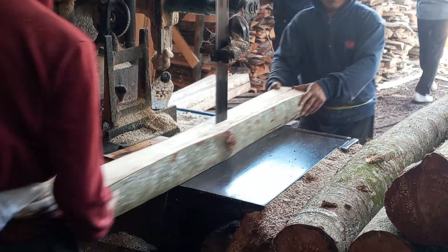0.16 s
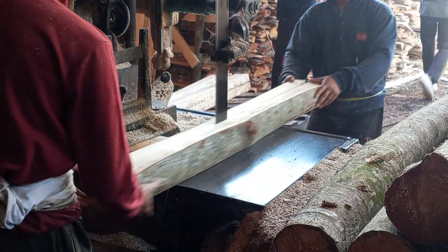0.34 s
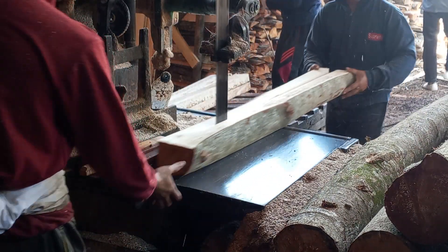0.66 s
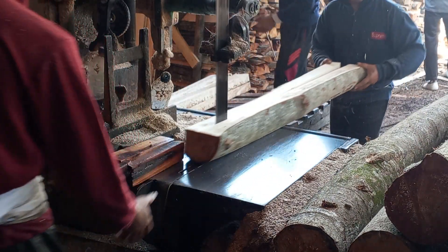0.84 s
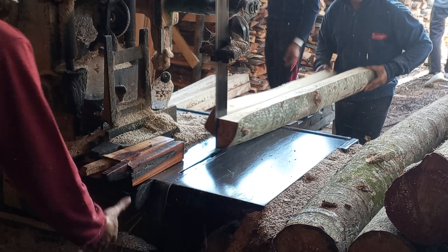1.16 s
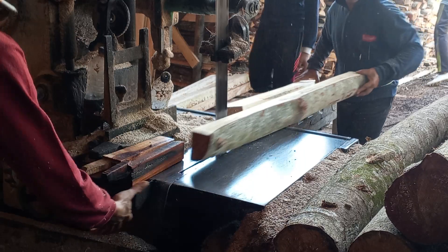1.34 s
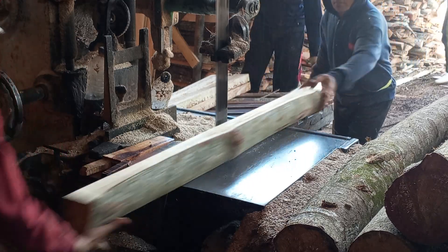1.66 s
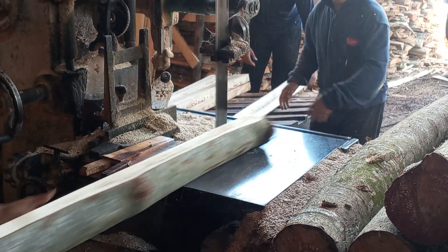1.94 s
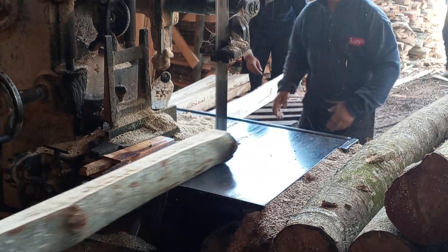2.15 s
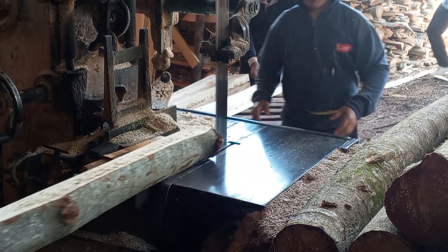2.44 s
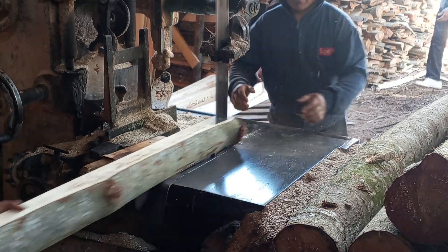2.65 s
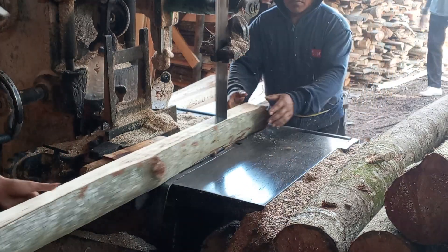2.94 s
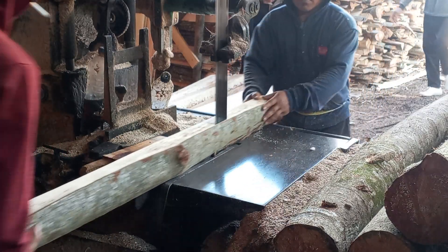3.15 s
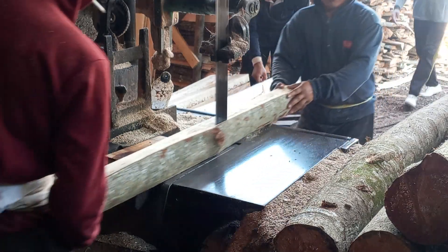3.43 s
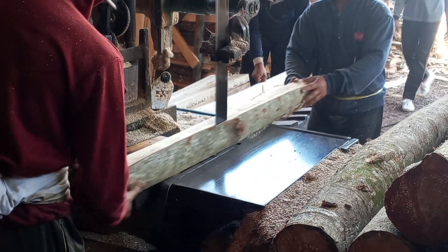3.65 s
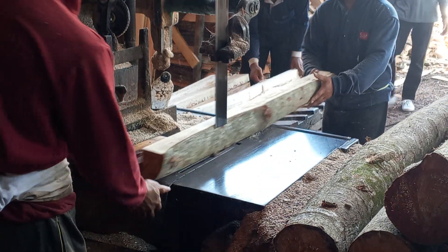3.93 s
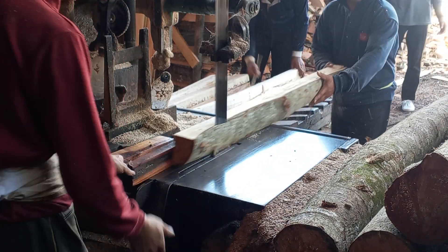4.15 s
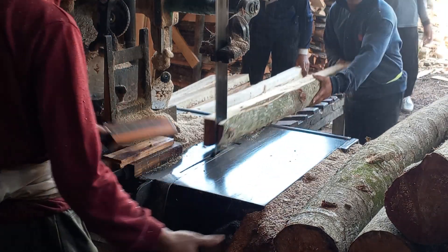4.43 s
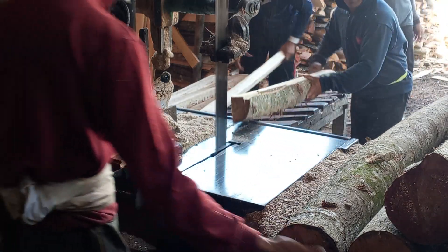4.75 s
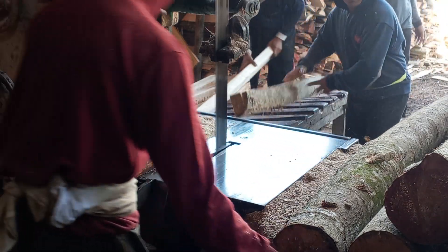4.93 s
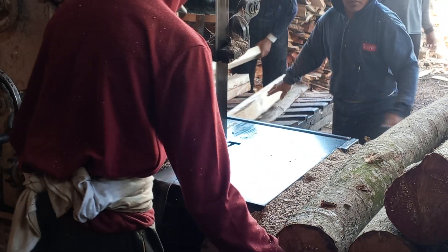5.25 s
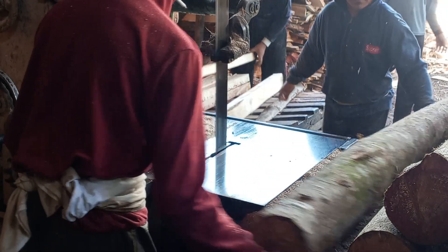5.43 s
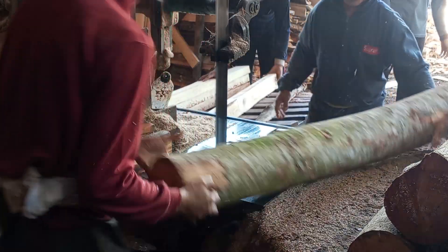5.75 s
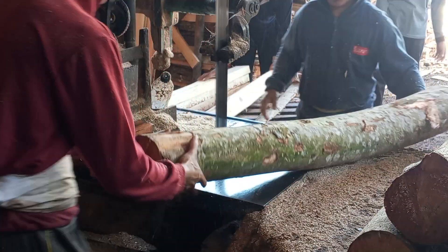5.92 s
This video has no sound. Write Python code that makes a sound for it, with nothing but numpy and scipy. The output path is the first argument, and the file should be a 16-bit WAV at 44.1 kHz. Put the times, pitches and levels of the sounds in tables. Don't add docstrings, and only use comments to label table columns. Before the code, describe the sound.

A band saw drones and hisses steadily while timber is ripped twice with a bright, wavering metallic whine, between dull knocks of wood.

```python
import sys
import numpy as np
from scipy import signal
from scipy.fft import rfft, irfft, next_fast_len
from scipy.io import wavfile
from scipy.ndimage import uniform_filter1d

SR = 44100
rng = np.random.default_rng(int(sys.argv[2]) if len(sys.argv) > 2 else 0)


def materialize(psi):
    bounded = np.clip(np.atleast_2d(psi).T, -1, 1)
    quanta = np.round(bounded * 32767).astype(np.int16)
    wavfile.write(sys.argv[1], SR, quanta)


def invert_db(level):
    return 10 ** (np.asarray(level, dtype=float) / 20)


N = 268569
TOP_CUT_HZ = 15720

# teeth_enter_s, teeth_leave_s
CUTS = [
    (-.3, 1.122),
    (2.62, 4.522),
]


def rms_one(x):
    return x / np.sqrt(np.mean(x ** 2) + 1e-20)


def curve(rows):
    s, value = np.transpose(rows)
    return np.interp(np.arange(N) / SR, s, value)


def swells(rows):
    t = np.arange(N // 40 + 2) * 40 / SR
    out = np.zeros(len(t))
    for s, length_s, level_db in rows:
        out += level_db * np.exp(-(2 * (t - s) / length_s) ** 4)
    return np.interp(np.arange(N) / SR, t, out)


def drift(rate_per_s):
    r = np.exp(-80 * np.pi * rate_per_s / SR)
    sparse = rng.standard_normal(N // 40 + 2002)
    slow = signal.lfilter([1], [1, -2 * r, r * r], sparse)[2000:]
    return np.interp(np.arange(N) / 40, np.arange(len(slow)), rms_one(slow))


def at_hz(points, hz):
    points_hz, points_db = np.transpose(points)
    return np.interp(np.log(hz), np.log(points_hz), points_db)


def coloured(spectrum, patchy_db, count):
    size = next_fast_len(N)
    hz = np.maximum(np.fft.rfftfreq(size, 1 / SR), 1)
    low_hz, high_hz = spectrum[0][0], spectrum[-1][0]
    inside = (hz > low_hz) & (hz < high_hz)
    noise = rfft(rng.standard_normal(size)) * invert_db(at_hz(spectrum, hz)) * inside
    place = np.log(hz / low_hz) / np.log(high_hz / low_hz) * (count - 1)
    out, together = 0, drift(21)
    for k in range(count):
        part = irfft(noise * np.clip(1 - np.abs(place - k), 0, 1), size)[:N]
        out = out + part * invert_db(patchy_db * (0.8 * together + drift(16)))
    return rms_one(out)


def resonance(x, hz, width_hz):
    r = np.exp(-np.pi * width_hz / SR)
    poles = [1, -2 * r * np.cos(2 * np.pi * hz / SR), r * r]
    return signal.lfilter([(1 - r * r) / 2, 0, (r * r - 1) / 2], poles, x)


def band_noise(length, low_hz, high_hz):
    sos = signal.butter(2, [low_hz, high_hz], "band", fs=SR, output="sos")
    return rms_one(signal.sosfilt(sos, rng.standard_normal(length)))


def tone(hz, wander_hz):
    wander_per_s = 11
    pitch_hz = hz + wander_hz * drift(wander_per_s)
    return np.sqrt(2) * np.sin(2 * np.pi * np.cumsum(pitch_hz) / SR)


def in_wood(leave_s):
    enter_s = 0.0096
    t, out = np.arange(N) / SR, 0
    for a, b in CUTS:
        leaving = np.exp(-np.clip(t - b, 0, 30 * leave_s) / leave_s)
        out = out + np.clip((t - a) / enter_s, 0, 1) * leaving
    return out


def machine_levels(damped):
    # time_s, level_db
    rub = [(0, -5), (.15, 10), (.42, 2), (1.05, 5.5), (1.17, 3.5), (1.27, -1.2), (1.5, -6), (1.95, 1.5),
           (2.3, 1.7), (2.6, -4.5), (2.76, 0), (3.35, 4), (3.9, -1), (4.25, 3.5), (4.56, 3), (4.66, 2.5),
           (5.5, -0.5), (6.09, 2.3)]
    rub_db, flutter_per_s = curve(rub), 8.4
    # mean_db, share of rub, loss in wood_db, flutter_db
    frame_layer, table_layer = (-34, -0.2, 0.6, 1.0), (-24, 0.36, 3, 2.24)
    blade_layer, wheel_layer = (-26.5, 0.24, 2, 0.9), (-34.5, 0.3, 0, 0.9)
    return [mean_db + share * rub_db - loss_db * damped + flutter_db * drift(flutter_per_s)
            for mean_db, share, loss_db, flutter_db in (frame_layer, table_layer, blade_layer, wheel_layer)]


def frame_drone(drone_db, bed_db):
    # frequency_hz, density_db
    drone_spectrum = [(21, -60), (35, -28.5), (152, -18), (264, -10), (331, -17.5), (539, -11),
                      (610, -14.5), (811, -6.5), (917, -7), (1500, -3), (2210, -0.5), (2440, 1.5),
                      (3250, 0), (3670, 1), (4600, -36.5), (5980, -47), (10100, -120)]
    drone = coloured(drone_spectrum, patchy_db=0.9, count=12)
    low = signal.sosfilt(signal.butter(2, 1100, fs=SR, output="sos"), drone)
    return invert_db(drone_db + 14) * low + invert_db(bed_db + 4) * (drone - low)


def steel_resonances(drone_db, hum_db, bed_db, ring_db, hiss_db):
    # centre_hz, width_hz, level_db
    modes = [(258, 18, -14), (440, 43, -7.5), (570, 17, -10.5), (687, 20.3, -4.5), (889, 35, -3),
             (916.4, 33, -3), (995, 20, -3), (1031, 12, -7), (1145, 52, -2), (1202, 9.5, -28),
             (1266, 29, -6), (1361, 13, -3.5), (2140, 6, -18), (2405, 40, -3), (2460, 50, -3),
             (2781, 40, -3), (3530, 40, -6), (2680, 880, -21.5), (2686, 93, -4.5), (2900, 650, -35),
             (3832, 140, -3), (8710, 106, -3)]
    flutter_db, out = 1.8, np.zeros(N)
    for hz, width_hz, level_db in modes:
        if hz < 800:
            follow_db = drone_db + 8
        elif hz < 940:
            follow_db = hum_db + 8
        elif hz < 2000:
            follow_db = bed_db + 4
        else:
            follow_db = ring_db if hz < 5000 else hiss_db
        rub = resonance(resonance(rng.standard_normal(N), hz, width_hz), hz, 5.4 * width_hz)
        out += invert_db(follow_db + level_db + 14 + flutter_db * drift(6)) * rub
    return out


def free_tones(hum_db, ring_db, damped):
    blade_loss_db = 7
    out = invert_db(hum_db - 5.5) * tone(898, wander_hz=10.89)
    for hz, wander_hz, level_db in [(2440, 28.2, -11.5), (2790, 26, -14)]:
        blade_db = ring_db + level_db - blade_loss_db * damped + 3 * drift(14)
        out += invert_db(blade_db) * tone(hz, wander_hz)
    return out


def blade_hiss(hiss_db):
    # frequency_hz, density_db
    hiss_spectrum = [(2470, -35), (4200, -12), (4930, -10.5), (5690, -4.5), (6040, 0.5), (6390, 0),
                     (6800, 0), (7020, -8.5), (7900, -8), (9090, -6), (10700, 1.5), (11400, -3),
                     (12600, -14), (13900, -20), (14800, -21.5), (16000, -13)]
    return invert_db(hiss_db + 5.5) * coloured(hiss_spectrum, patchy_db=0.5, count=9)


def machine():
    # middle_s, length_s, level_db
    beats = [(.12, 0.091, 3.5), (.36, 0.086, 6.5), (.74, 0.062, 6), (1.02, 0.05, 2), (1.56, 0.14, 8),
             (2.2, 0.21, 4), (2.44, 0.089, 4), (3.3, 0.24, 2), (3.64, 0.06, 4), (4.35, 0.35, 6.5),
             (4.7, 0.13, 3.5), (4.88, .08, 9.5), (5.04, 0.042, 9), (5.32, .05, 6.5), (5.46, 0.1, 5.5),
             (6.07, 0.076, 7.5)]
    # middle_s, length_s, level_db
    settles = [
        (1.45, 0.22, -2),
        (2.85, .32, -2.5),
    ]
    damped = in_wood(leave_s=0.036)
    drone_db, ring_db, hiss_db, hum_db = machine_levels(damped)
    hum_db = hum_db + swells(beats)
    drone_db = uniform_filter1d(drone_db + swells(settles), size=SR // 8)
    bed_db = uniform_filter1d((drone_db + ring_db + hiss_db) / 3, size=SR // 14)
    out = frame_drone(drone_db, bed_db)
    out += steel_resonances(drone_db, hum_db, bed_db, ring_db, hiss_db)
    out += free_tones(hum_db, ring_db, damped)
    return out + blade_hiss(hiss_db)


def whine_levels(bite_db):
    # multiple, level at mean feed_db
    low_orders = [(2, -40.5), (3, -36), (4, -40), (6, -41)]
    # multiple, above low whine_db, above chip hiss_db
    high_orders = [(1, -4.5, -40), (5, -6, -22), (7, -20, -1), (8, -20, -7), (9, -20, -4.5), (10, -20, 3),
                   (11, -20, 6), (12, -20, 3), (13, -30, -6), (14, -30, -25), (15, -30, -3)]
    # middle_s, length_s, multiple, level_db
    sings = [(0.026, 0.087, 6, 8.5), (0.157, 0.22, 3, 5.5), (0.22, 0.12, 2, 4), (.62, .16, 3, 4),
             (0.923, 0.37, 3, 4.5), (1.12, 0.11, 2, 6), (1.08, 0.21, 4, 10), (2.86, 0.045, 2, 12.5),
             (2.865, .12, 3, 7.5), (3.08, 0.13, 2, 9.5), (3.089, .24, 3, 5), (3.109, 0.42, 6, 9),
             (3.4, .2, 4, 12), (3.36, .16, 6, 11), (3.72, 0.11, 2, 4), (4.174, 0.4, 2, 14.5),
             (3.95, 0.14, 2, 3), (4.057, 0.27, 3, 9.5), (4.298, 0.13, 3, 7), (3.93, 0.37, 6, 6.5),
             (4.22, .2, 6, 4), (4.13, 0.1, 4, 12), (4.37, .16, 4, 7)]
    feed_mean_db, feed_share = -35, 0.25
    grain_db_per_octave, grain_per_s = 1.1, 22
    end_s, end_strike_db, end_full_up_to = 0.095, 16, 2.6
    end_db = swells([(CUTS[1][0] + 0.37 * end_s, end_s, end_strike_db)])
    levels = []
    for k, mean_db in low_orders:
        level_db = mean_db + feed_share * (bite_db - feed_mean_db)
        level_db = level_db + end_db * min(1, end_full_up_to / k)
        level_db += grain_db_per_octave * np.log2(k) * drift(grain_per_s)
        level_db += swells([(s, length_s, db) for s, length_s, m, db in sings if m == k])
        levels.append((k, level_db))
    whine_db = np.mean([db for k, db in levels[1:]], axis=0) + 0.28 * end_db
    for k, whine_part_db, bite_part_db in high_orders:
        levels.append((k, np.maximum(whine_db + whine_part_db, bite_db + bite_part_db)))
    return levels


def tooth_whine(bite_db):
    # time_s, tooth_rate_hz
    speed = [(0, 977), (.4, 972), (1.14, 973), (2.62, 992), (2.76, 980), (3.03, 973.5), (3.69, 965),
             (4.13, 969), (4.53, 969)]
    blur_hz, clean_up_to = 1.7, 5.2
    phase = 2 * np.pi * np.cumsum(curve(speed)) / SR
    out = np.zeros(N)
    for k, level_db in whine_levels(bite_db):
        clean = np.exp(-(k / clean_up_to) ** 2)
        blur = (drift(blur_hz * k * k) + 1j * drift(blur_hz * k * k)) / np.sqrt(2)
        swing = np.sqrt(clean) + np.sqrt(1 - clean) * blur
        turning = np.exp(1j * (k * phase + rng.uniform(0, 2 * np.pi)))
        out += np.sqrt(2) * invert_db(level_db) * np.real(swing * turning)
    return out


def chip_hiss(bite_db):
    # frequency_hz, density_db
    chip_spectrum = [(6000, -39), (7600, 0.5), (8150, -36), (8600, 3), (9200, -9), (9720, 5), (10800, 3),
                     (12400, -12), (13300, -9), (13900, -24), (14500, -6), (15200, -6), (16000, -12)]
    return invert_db(bite_db + 8.5) * coloured(chip_spectrum, patchy_db=3, count=6)


def cut():
    # time_s, level_db
    feed = [(0, -32.5), (.15, -35), (.3, -35), (.6, -32.5), (1.1, -33), (2.63, -39), (2.72, -39),
            (2.9, -36), (3.3, -37.5), (3.37, -32), (3.5, -37), (3.8, -33), (4.35, -41), (4.5, -36.5)]
    bite_db = curve(feed)
    return (tooth_whine(bite_db) + chip_hiss(bite_db)) * in_wood(leave_s=0.0058)


def timber_knocks():
    # start_s, peak_db, ring_hz, thud_hz, thud_db
    knocks = [(1.767, -10.5, 609, 310, -25), (1.791, -21, 643, 110, -34), (1.807, -25, 588, 100, -46),
              (5.157, -11, 193, 120, -21), (5.168, -22, 344, 62, -28), (5.186, -20, 295, 109, -33),
              (5.679, -22, 627, 266, -21), (5.693, -18, 420, 268, -23), (5.71, -24.5, 707, 416, -37),
              (5.723, -32, 873, 258, -43), (5.864, -46, 400, 204, -31)]
    ring_t60_per_hz = 0.00022
    out, t = np.zeros(N), np.arange(SR // 2) / SR
    for s, peak_db, hz, thud_hz, thud_db in knocks:
        hit = invert_db(peak_db - 60 * t / (ring_t60_per_hz * hz)) * np.sin(2 * np.pi * hz * t)
        hit += invert_db(thud_db - 60 * t / 0.12) * np.sin(2 * np.pi * thud_hz * t)
        hit += invert_db(peak_db - 10 - 60 * t / 0.22) * band_noise(len(t), 107, 1050)
        i = round(s * SR)
        out[i:i + len(t)] += (hit * (1 - np.exp(-t / 0.0073)))[:N - i]
    return out


def entry_crunch():
    # start_s, level_db, t60_s, low_hz, high_hz
    crunches = [
        (2.623, -20, 0.22, 890, 2600),
        (2.643, -22.5, 0.45, 1100, 2600),
        (2.655, -31, 0.24, 800, 3400),
    ]
    out, t = np.zeros(N), np.arange(SR // 2) / SR
    for s, level_db, t60_s, low_hz, high_hz in crunches:
        i = round(s * SR)
        crunch = band_noise(len(t), low_hz, high_hz)
        out[i:i + len(t)] += invert_db(level_db - 60 * t / t60_s) * np.minimum(t / 0.004, 1) * crunch
    return out


def scene():
    # middle_s, length_s, level_db
    ducks = [
        (1.165, 0.064, -2.5),
        (2.77, 0.31, -0.5),
        (4.56, .07, -1.5),
    ]
    mix = machine() + cut() + timber_knocks() + entry_crunch()
    return np.tile(mix * invert_db(swells(ducks)), (2, 1))


def unrelated_patches(x):
    patched_blocks = [6, 80, 82, 95, 116, 131, 158, 190, 211, 223, 227, 233, 257]
    block, offset, width_hz = 1024, 759, 1500
    low_edges_hz = (12000, 14200), (4200, 11500)
    window = signal.windows.kaiser_bessel_derived(2 * block, 4 * np.pi)
    n = np.arange(2 * block) + 0.5 + block / 2
    bins_per_hz = 2 * block / SR
    patches = [(number, rng.uniform(*span)) for number in patched_blocks for span in low_edges_hz]
    for number, low_hz in patches:
        high_hz = min(low_hz + width_hz, TOP_CUT_HZ)
        part = slice(offset + (number - 1) * block, offset + (number + 1) * block)
        k = np.arange(round(low_hz * bins_per_hz), round(high_hz * bins_per_hz)) + 0.5
        waves = np.sqrt(2 / block) * window * np.cos(np.pi / block * np.outer(k, n))
        old = x[:, part] @ waves.T
        local = np.sqrt(uniform_filter1d(old ** 2, size=32))
        x[:, part] += (local * rng.standard_normal(old.shape) - old) @ waves
    return x


def roll_off(x):
    return signal.sosfilt(signal.butter(12, 16820, fs=SR, output="sos"), x)


def record(dry):
    x = 1.002 * np.tanh(dry / 0.82)
    x = signal.sosfilt(signal.butter(2, 38, "high", fs=SR, output="sos"), x)
    x = signal.sosfilt(signal.ellip(14, 0.3, 85, TOP_CUT_HZ, fs=SR, output="sos"), x)
    x = unrelated_patches(x)
    return roll_off(x)


dry = scene()
out = record(dry)
materialize(out)
```